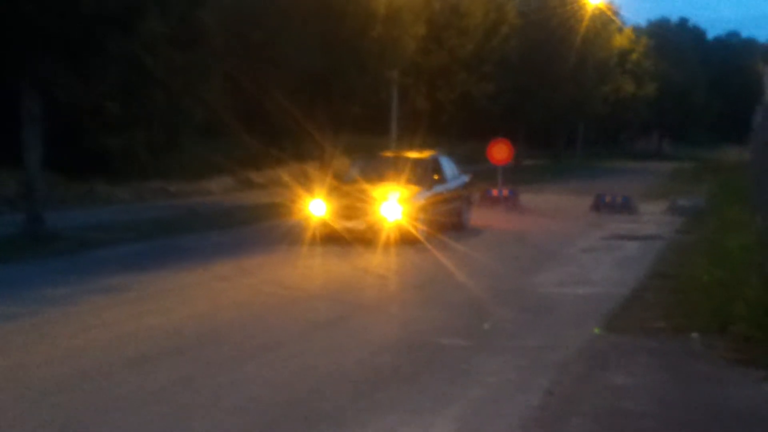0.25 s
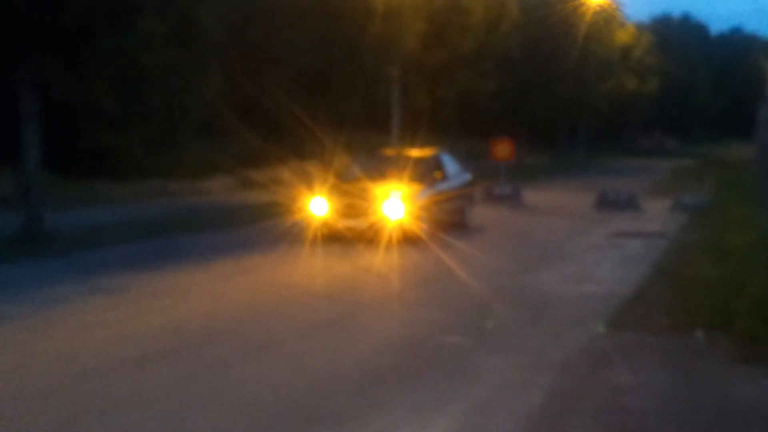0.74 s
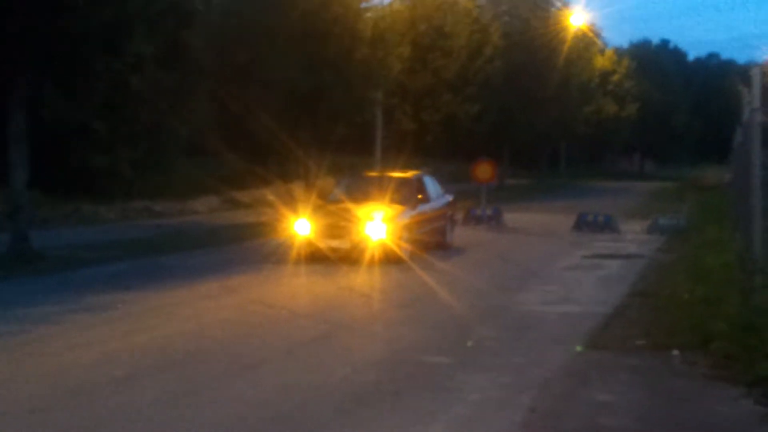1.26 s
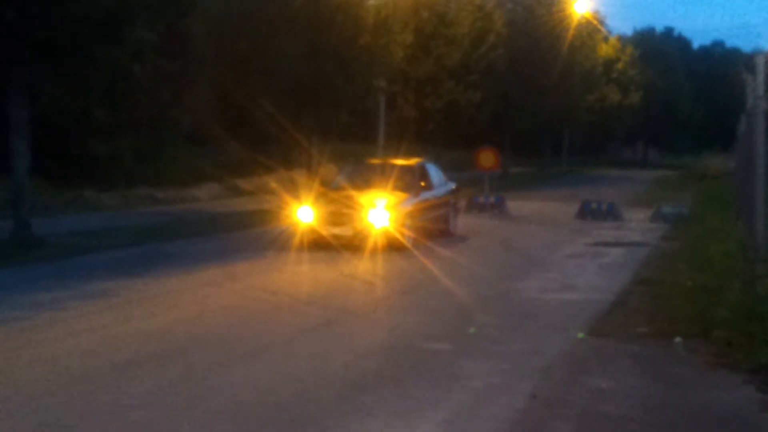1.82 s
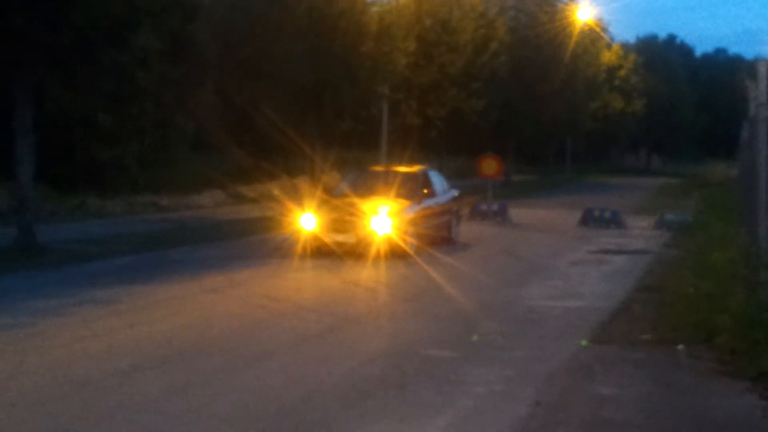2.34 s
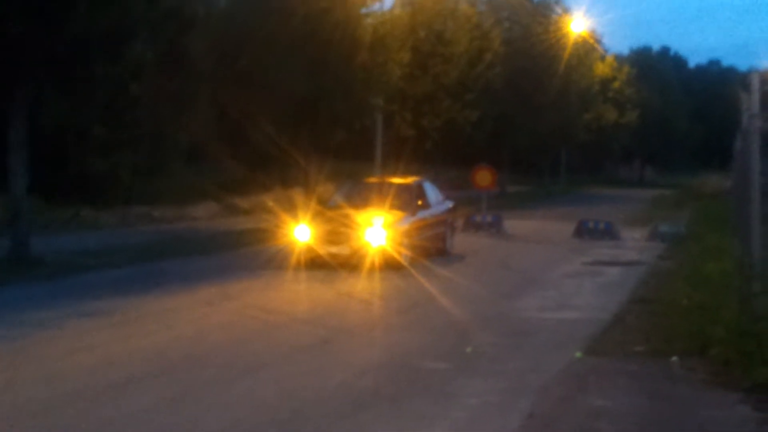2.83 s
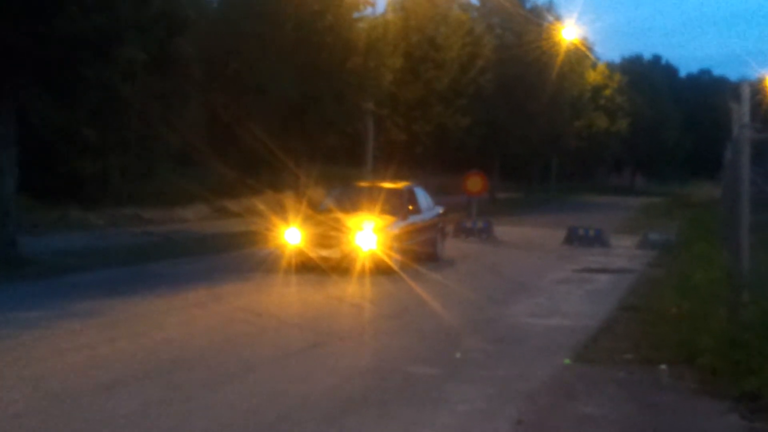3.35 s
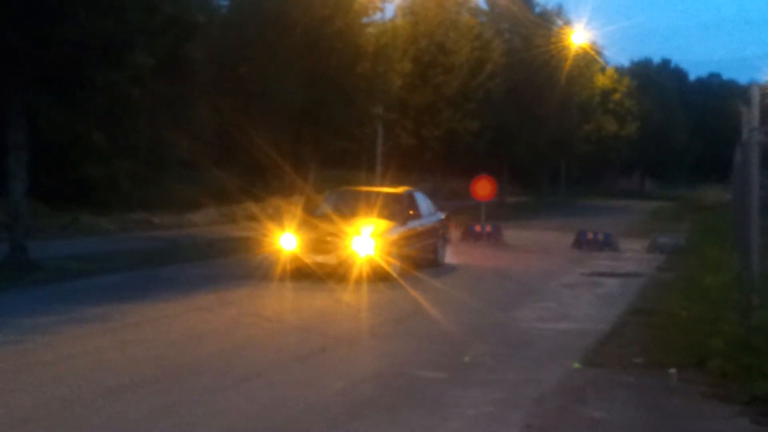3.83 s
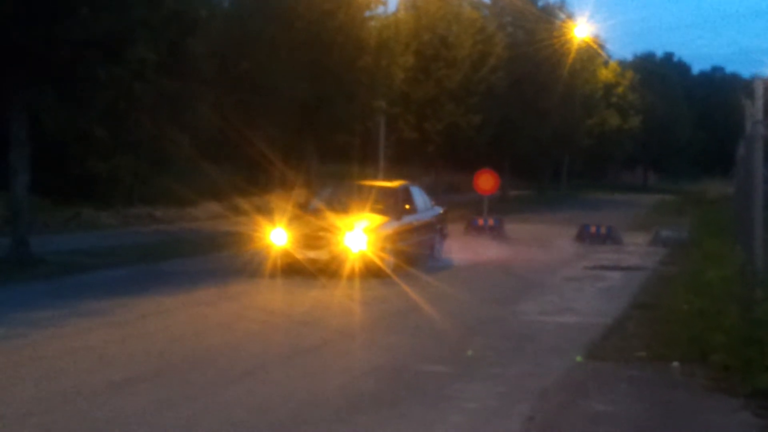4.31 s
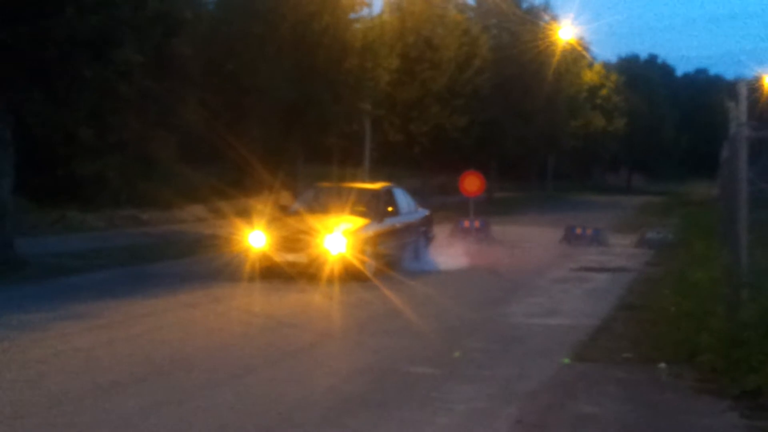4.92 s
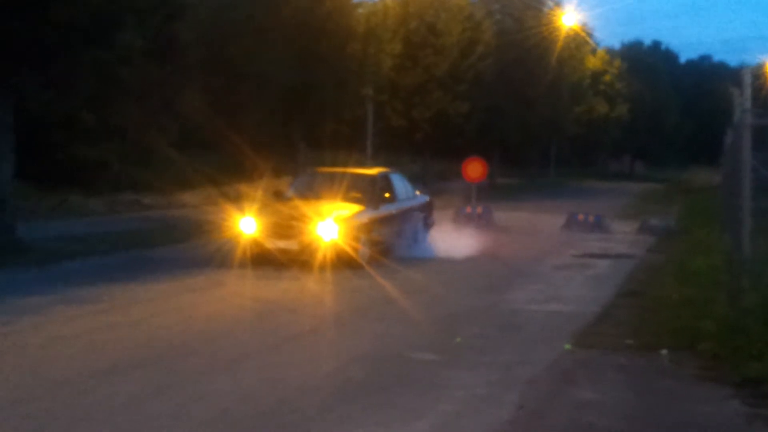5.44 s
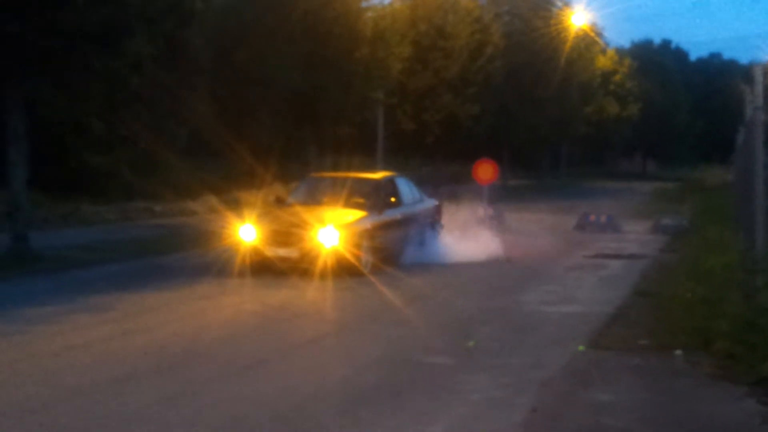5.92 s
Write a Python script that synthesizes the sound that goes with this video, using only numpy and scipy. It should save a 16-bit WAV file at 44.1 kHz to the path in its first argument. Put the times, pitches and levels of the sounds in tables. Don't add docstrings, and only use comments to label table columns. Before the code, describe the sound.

A six-cylinder turbo car idles fast and fairly quietly for nearly a second and a half, then blips upward in quick steps. Around three seconds the rear tyres spin, and rushing rubber roar, short squeals and gear whine join the barking exhaust. Revs surge and drop repeatedly with valve puffs and high turbo whistle. Handheld stereo microphone outdoors, several metres ahead, slight soft clipping, short echo from trees.

```python
import sys
import numpy as np
from scipy import signal
from scipy.fft import rfft, irfft, next_fast_len
from scipy.io import wavfile
from scipy.ndimage import uniform_filter1d, map_coordinates

SR = 44100
rng = np.random.default_rng(int(sys.argv[2]) if len(sys.argv) > 2 else 0)


def transcribe(u):
    v = np.clip(np.atleast_2d(u).T, -1, 1)
    q = np.round(v * 32767).astype(np.int16)
    wavfile.write(sys.argv[1], SR, q)


def convert_level_to_amplitude(level_db):
    exponent = np.asarray(level_db, float) / 20
    return 10 ** exponent


N = 272097
TIME = np.arange(N) / SR
EVEN = .065


def unit(x):
    return x / np.sqrt(np.mean(x ** 2) + 1e-20)


def steady(x):
    return x / np.sqrt(np.abs(uniform_filter1d(x ** 2, size=4000)) + 1e-12)


def along(points, hz):
    f, v = np.transpose(points)
    return np.interp(np.log(hz + 1), np.log(f + 1), v)


def curves(rows):
    s, *cols = np.transpose(rows)
    return [np.interp(TIME, s, c) for c in cols]


def wobble(rate):
    return map_coordinates(rng.standard_normal(int(N * rate / SR) + 4), [TIME * rate])


def bump(center_s, width_s):
    return np.exp(-((TIME - center_s) / width_s) ** 2)


def filtered(x, response):
    m = next_fast_len(N + SR // 2)
    return irfft(rfft(x, m) * response(np.fft.rfftfreq(m, 1 / SR)), m)[..., :N]


def causal(points):
    def response(hz):
        c = irfft(np.log(convert_level_to_amplitude(along(points, hz)) + 1e-6))
        c[1:len(c) // 2] *= 2
        c[len(c) // 2 + 1:] = 0
        return np.exp(rfft(c))
    return response


def above(hz, edge_hz):
    return 1 / (1 + (edge_hz / (hz + 1)) ** 8)


# (opens [s], shuts [s], half the firing rate as it takes hold [Hz],
# the same at the end [Hz], exhaust level [dB])
PRESSES = [(-.1, 1.275, 38.96, 39.82, -29), (1.447, 1.551, 37.1, 48.95, -16),
           (1.547, 1.62, 53.5, 58.5, -13), (1.622, 1.66, 63.12, 65.6, -17.5),
           (1.788, 1.857, 63.97, 65.1, -13.5), (1.937, 2.086, 66.4, 90.45, -12.5),
           (2.087, 2.211, 96.8, 113.2, -16), (2.265, 2.497, 108.1, 105.5, -17.5),
           (2.581, 2.724, 104.3, 127.3, -12.5), (2.72, 2.859, 134.3, 156, -14),
           (2.921, 3.02, 149.4, 142.2, -16), (3.113, 3.312, 144.6, 175.3, -13),
           (3.35, 3.435, 172, 168.5, -11.5), (3.477, 3.601, 111.1, 116, -17.5),
           (3.625, 3.724, 119.7, 125.7, -16.5), (3.741, 4.073, 127.1, 158.2, -17.5),
           (4.25, 4.528, 116.6, 147.2, -16), (4.655, 4.728, 110.5, 108.2, -15.5),
           (4.731, 5.0, 112.9, 156.8, -16), (4.997, 5.125, 159.4, 163.9, -18),
           (5.355, 5.639, 106.7, 138.2, -15.5), (5.64, 5.76, 138.2, 138.8, -18.5),
           (5.77, 6.046, 138.6, 157.6, -16.5)]


def driver():
    takes_hold_s, flywheel_s, last_hz = .03, .03, 134.6
    open_s, shut_s = .008, .03
    clutch_in_s = 3.48
    ms, t = 1000, np.arange(0, N / SR, .001)
    opens, shuts, start_hz, end_hz, db = np.transpose(PRESSES)
    knot_s = np.append(np.ravel([opens + takes_hold_s, shuts], "F"), N / SR)
    knot_hz = np.append(np.ravel([start_hz, end_hz], "F"), last_hz)
    half_hz = uniform_filter1d(np.interp(t, knot_s, knot_hz), size=int(flywheel_s * ms))
    octaves = np.log2(half_hz / 100)
    rising = np.gradient(np.log(half_hz)) * ms

    opening = (t - opens[:, None]) / open_s + 1
    shutting = (shuts[:, None] - t) / shut_s + 1
    held = np.clip(np.minimum(opening, shutting), 0, 1)
    throttle = np.minimum(held.sum(0), 1)
    coast_db = np.minimum(-26 + 5.5 * octaves, -19)
    pressed_db = (db @ held) / (held.sum(0) + 1e-9)
    thump_db = throttle * pressed_db + (1 - throttle) * coast_db

    loaded = t > clutch_in_s
    idling = t < opens[1] - open_s
    free = ~idling * (t < clutch_in_s) * np.clip(1 - 2 * rising, 0, 1)
    lug_db = 7 * throttle * loaded * np.clip((115.2 - half_hz) / 12, 0, 1)
    pull_db = 1.5 * loaded - 8.5 * free + 1.5 * np.clip(rising, 0, 1.2)
    bark_db = throttle * (-2 + pull_db) + (1 - throttle) * -2.5 + 7.5 * np.minimum(octaves, 0)
    bark_db = np.where(idling, -19.5, bark_db + lug_db)

    hunting = .1 * free * (half_hz < 160) + .04 * ~idling * np.clip(-octaves, 0, 1)
    uneven = .09 + .16 * np.maximum(-rising, 0) + .35 * idling
    rough = np.minimum(EVEN + hunting + (1 - throttle) ** 2 * uneven, .47)
    return [np.interp(TIME, t, c) for c in (half_hz, thump_db - lug_db, bark_db, rough)]


# (pulse strength [dB], lateness [share of a firing gap], extra at idle [dB])
CYLINDERS = [(.6, 0, 0), (-4.4, .13, 1.5), (-.6, .01, 3.5), (-4, .12, 0), (0, -.01, -3.5), (-5, .11, -1.5)]


def firings(turns, load, rough):
    k = np.arange(int(turns[-1]) - 1)
    db, late, idle_db = np.array(CYLINDERS)[k % 6].T
    chance = np.clip(rng.standard_normal((len(k), 2)), -1.3, 1.3)
    when = np.interp(k, turns, TIME)
    rough = np.interp(when, TIME, rough)
    db = db * (1 + 5 * (rough - EVEN)) + idle_db * (1 - np.interp(when, TIME, load))
    late = late * (1 + .28 * (when > 1.45) * wobble(9)[(when * SR).astype(int)])
    jitter = np.clip(.45 * rough * chance[:, 0], -.4, .4)
    at = np.interp(k + .5 + late + jitter, turns, np.arange(N))
    size = convert_level_to_amplitude(db + 18 * np.minimum(rough, .35) * chance[:, 1])
    taps = np.floor(at)[:, None] + np.arange(-7, 9)
    offset = taps - at[:, None]
    kernel = np.sinc(offset) * np.cos(np.pi * offset / 16) ** 2
    return np.bincount(taps.astype(int).ravel(), (size[:, None] * kernel).ravel(), N + 16)[:N]


# (frequency [Hz], level [dB])
IDLE_PIPE = [(60, -45), (85, -24), (118, -8), (140, -15.5), (160, -8.5), (196, 1), (240, -8), (275, -17),
             (312, 5.5), (350, -23), (430, -13), (500, -24.5), (620, -14), (800, -69), (4000, -115)]
# (frequency [Hz], level [dB])
LOAD_PIPE = [(60, -64), (100, -13.5), (150, -7), (220, 2), (300, 1.5), (385, -5.5), (450, 2), (510, -3.5),
             (600, 0.5), (730, -3), (850, -15.5), (1000, -6.5), (1400, -38), (6000, -110)]


def exhaust(load, half_hz, thump_db, bark_db, rough):
    pulses = firings(np.cumsum(2 * half_hz) / SR, load, rough)
    gas = steady(pulses) + .17 * rng.standard_normal(N)
    idle = unit(filtered(gas, causal(IDLE_PIPE)))
    loaded = unit(filtered(gas, causal(LOAD_PIPE)))
    pipe = (1 - load) * idle + load * loaded
    bark = filtered(pipe, lambda hz: above(hz, 425))
    return convert_level_to_amplitude(thump_db) * (steady(pipe - bark) + convert_level_to_amplitude(bark_db - 1.5) * steady(bark))


# (time [s], roar level [dB], turbo boost [0-1])
SPIN = [(0, -41, 0.36), (1.41, -40, 0.26), (1.58, -32.5, 0.03), (1.9, -32.5, 0), (2.18, -24.5, 0),
        (2.42, -24.5, 0), (2.57, -26.5, 0.05), (2.8, -21, .1), (3.4, -17, .35), (3.6, -15, .6),
        (3.85, -14.5, 0.68), (4.3, -15.5, 0.93), (5.0, -16.5, 0.94), (5.3, -15, .7), (5.55, -16.5, 1.05),
        (6.17, -17.5, 0.9)]
# (time [s], level over the roar [dB], width [s])
PUFFS = [(2.46, 2.5, 0.034), (2.86, 3.5, 0.11), (3.28, 0.5, 0.02), (3.485, 8, 0.029), (3.608, 5.5, 0.0078),
         (3.78, 2, 0.015), (4.098, 5, 0.035), (4.54, 5.5, 0.026), (4.608, 1, 0.011), (5.08, 2.5, 0.036),
         (5.129, 4.5, 0.016), (5.19, 3, 0.05), (5.275, 2.5, 0.016), (5.76, 2.5, 0.075), (5.96, 2, 0.029),
         (6.068, 6, 0.026), (6.142, 3.5, 0.033)]


def rush_levels(half_hz):
    spin_db, boost = curves(SPIN)
    puff_db = sum(db * bump(s, width) for s, db, width in PUFFS)
    hiss_db = -20.5 + 11 * boost + 0.92 * wobble(22)
    air = convert_level_to_amplitude(-43.5 + 25 * boost + 4 * np.log2(half_hz / 130) + 2.5 * wobble(16))
    idle_air = convert_level_to_amplitude(-58 - spin_db) * np.clip((2.1 - TIME) / .3, 0, 1)
    return spin_db + puff_db, hiss_db, 20 * np.log10(air + idle_air) - 0.45 * puff_db


# (frequency [Hz], likeness [-1 to 1])
ALIKE = [(60, .99), (600, .99), (1200, .88), (2000, .85), (3000, .88), (5000, .7), (8000, -.2),
         (13000, -.3)]


def pair(spectrum, patchy_db):
    z = signal.stft(rng.standard_normal((2, N + 512)), nperseg=512)[2]
    field = uniform_filter1d(rng.standard_normal(z.shape[1:]), size=4, axis=0)
    field = uniform_filter1d(field, size=5, axis=1)
    two = signal.istft(z * convert_level_to_amplitude(patchy_db * unit(field)), nperseg=512)[1][:, :N]

    def spread(hz):
        turn = np.arccos(np.clip(along(ALIKE, hz), -1, 1)) / 2
        return convert_level_to_amplitude(along(spectrum, hz)) * [np.cos(turn), np.sin(turn)]
    mid, side = filtered(two, spread)
    return np.array([mid + side, mid - side])


def chirps(count, pitch_hz=2100, spread=.27, life=0.022):
    u, g = rng.random((count, 2)), rng.standard_normal((count, 2))
    t = np.arange(3000) / SR
    g = np.clip(g, -2, 2)
    hz = pitch_hz * np.exp(spread * g[:, :1])
    span = life * (.5 + 1.2 * u[:, 1:])
    swell = np.sin(np.pi * np.clip(t / (2 * span), 0, 1)) ** 2
    tone = convert_level_to_amplitude(3 * g[:, 1:]) * np.sin(2 * np.pi * hz * t) * swell
    at = (u[:, :1] * N).astype(int) + np.arange(len(t))
    return unit(np.bincount(at.ravel(), tone.ravel())[:N])


def bounced(x, bounce):
    first, gap, db = np.transpose(bounce)[:, :, None]

    def mirror(hz):
        strength = convert_level_to_amplitude(db) * above(hz, 550) * (1 - above(hz, 6500))
        return strength * np.exp(-2j * np.pi * (hz - first) / gap)
    return filtered(x, lambda hz: 1 - mirror(hz))


# (frequency [Hz], level [dB per Hz])
BAY = [(350, -26), (600, -10), (800, -9), (1130, -15), (1340, -17), (1580, -16.5), (2720, -18),
       (6750, -37.5), (14300, -35.5)]
# (frequency [Hz], level [dB per Hz])
RUBBER = [(250, -24.5), (500, -3.5), (900, -4), (1420, -5), (2400, -7.5), (3400, -4), (4500, -18),
          (6080, -32), (10000, -29.5), (14300, -32.5)]
# (time [s], level [dB], width [s])
PEDAL = (1.225, -43, .022)
# (first notch [Hz], notch spacing [Hz], strength [dB])
BOUNCE_IDLE = [(860, 503, -4), (820, 520, -5)]
# (first notch [Hz], notch spacing [Hz], strength [dB])
BOUNCE_SPIN = [(934, 531, -0.5), (811, 584, -13)]


def roar(spin, half_hz):
    roar_db, hiss_db, air_db = rush_levels(half_hz)
    bay = bounced(pair(BAY, patchy_db=-2.56), BOUNCE_IDLE)
    rubber = unit(pair(RUBBER, patchy_db=1.0))
    rubber = rubber + 0.4 * np.clip((TIME - 3) * 2, 0, 1) * chirps(count=900)
    rubber = bounced(rubber, BOUNCE_SPIN)
    bands = [(0, lambda hz: 1 - above(hz, 4800)),
             (hiss_db, lambda hz: above(hz, 4800) - above(hz, 10200)),
             (air_db + 2, lambda hz: above(hz, 10200))]
    total = 0
    for db, band in bands:
        mix = np.sqrt(1 - spin) * unit(filtered(bay, band))
        mix = mix + np.sqrt(spin) * unit(filtered(rubber, band))
        total = total + convert_level_to_amplitude(db + 0.82 * wobble(14)) * mix
    pedal_s, pedal_db, width_s = PEDAL
    rasp = unit(filtered(bay, lambda hz: above(hz, 1500) * hz))
    return convert_level_to_amplitude(roar_db) * total + convert_level_to_amplitude(pedal_db) * bump(pedal_s, width_s) * rasp


# (time [s], length [s], start
# pitch [Hz], end pitch [Hz], level [dB])
SQUEALS = [(3.264, 0.036, 2860, 2750, -23), (3.47, 0.046, 1765, 1826, -22), (4.345, 0.037, 1750, 1960, -17),
           (4.836, 0.087, 1610, 1620, -22), (4.857, 0.047, 2800, 2860, -21.5),
           (5.147, 0.018, 1840, 1734, -22), (5.234, .065, 2130, 2205, -18), (5.239, 0.058, 1444, 1564, -17),
           (5.637, 0.066, 1776, 1721, -19.5), (5.702, 0.115, 1640, 1700, -17),
           (5.798, 0.15, 1710, 1777, -19), (5.94, 0.089, 2730, 2580, -15.5)]


def squeals():
    out = np.zeros(N)
    for s, length, start_hz, end_hz, db in SQUEALS:
        u = np.linspace(0, 1, int(length * SR))
        hz = start_hz + (end_hz - start_hz) * u
        tone = np.sin(2 * np.pi * np.cumsum(hz) / SR)
        out[int(s * SR):][:len(u)] += convert_level_to_amplitude(db) * np.sin(np.pi * u) * tone
    return out * convert_level_to_amplitude(2.5 * wobble(70) - 1.5)


# (time [s], pitch [Hz], level [dB])
TURBO = [
    [(3.72, 7900, -46), (3.86, 8980, -39), (4.01, 9980, -37), (4.07, 10150, -41)],
    [(4.2, 8400, -47), (4.38, 9400, -39), (4.54, 10050, -42)],
    [(4.78, 8750, -45), (4.94, 9820, -39), (5.04, 10200, -37), (5.12, 10380, -42)],
    [(5.5, 8650, -42), (5.62, 9350, -40), (5.7, 9750, -45)],
    [(5.84, 9650, -43), (5.93, 9950, -40), (6.04, 10300, -43)],
]


def turbo():
    out = np.zeros(N)
    for rows in TURBO:
        hz, db = curves(rows)
        fade = np.clip(np.minimum(TIME - rows[0][0], rows[-1][0] - TIME) / 0.042, 0, 1)
        whistle = np.sin(2 * np.pi * np.cumsum(hz + 45 * wobble(150)) / SR)
        out += fade * convert_level_to_amplitude(db + 2.5 + 2.5 * wobble(50)) * whistle
    return out * [[1.2], [.8]]


# (multiple of half the firing rate, level under full spin [dB])
GEARS = [(7, -24), (12, -31)]


def gears(spin, half_hz, rough):
    phase = 2 * np.pi * np.cumsum(half_hz) / SR
    whine = 0
    for k, db in GEARS:
        level = convert_level_to_amplitude(db + 4 * np.clip(wobble(14), -3, 1))
        whine = whine + level * np.sin(k * phase + 1.4 * wobble(40))
    return spin * (1 - rough) ** 6 * whine


# (frequency [Hz], time to fall 60 dB [s])
TREES = [(100, 0.5), (1000, 0.097), (8000, 0.083)]


def trees(x):
    hz, t, z = signal.stft(rng.standard_normal((2, SR // 2)), SR, nperseg=256)
    tail = signal.istft(z * convert_level_to_amplitude(-60 * t / along(TREES, hz)[:, None]), SR, nperseg=256)[1]
    tail = tail.mean(0) + .5 * (tail - tail.mean(0))
    late = np.pad(x, (700, 0))[None]
    return signal.fftconvolve(late, tail / np.linalg.norm(tail[0]), axes=1)[:, :N]


def scene():
    half_hz, thump_db, bark_db, rough = driver()
    load = np.interp(TIME, [1.44, 1.452], [0, 1])
    spin = np.interp(TIME, [1.9, 3.3], [0, 1])
    thump_db = thump_db + .8 * load * wobble(30)
    pipe = -exhaust(load, half_hz, thump_db, bark_db + 1.2 * wobble(30), rough)
    tones = bounced(gears(spin ** 2, half_hz, rough) + squeals(), BOUNCE_SPIN)
    return pipe + convert_level_to_amplitude(-8.0) * trees(pipe) + tones + roar(spin, half_hz) + turbo()


def masked(x):
    hz, _, z = signal.stft(x, SR, nperseg=2048)
    power = np.abs(z[:, :1024]) ** 2
    band = power.reshape(2, 128, 8, -1).sum(2).mean(0)
    below_db = 10 * np.log10(band / power.sum(1).mean(0) + 1e-12)
    khz = hz[4:1024:8, None] / 1000
    luck = unit(uniform_filter1d(rng.standard_normal(band.shape), size=2, axis=1))
    keep = (below_db + 11 * luck > 1.5 * khz - 77) | (khz < 5.6)
    keep = np.pad(keep.repeat(8, 0), ((0, 1), (0, 0)))
    return signal.istft(z * keep, SR, nperseg=2048)[1][:, :N]


def top_cut(x):
    return signal.sosfilt(signal.butter(12, 14480, fs=SR, output="sos"), x)


# (frequency [Hz], left over right [dB])
TILT = [(60, 9), (110, 4), (200, 4), (370, 1.5), (670, 0), (1230, -8), (2260, -6.5), (4140, -2.5),
        (7580, 4), (13900, 7.5)]


def record(dry):
    x = filtered(dry, lambda hz: convert_level_to_amplitude(along(TILT, hz) * np.array([[.5], [-.5]])))
    x = x / (1 + np.abs(x / 1.15) ** 6) ** (1 / 6)
    x = filtered(x, lambda hz: np.maximum(above(hz, 75), .3) * (hz < 14480))
    rumble = filtered(rng.standard_normal((2, N)), lambda hz: (hz > 15) * (1 - above(hz, 60)) * 20)
    return top_cut(masked(x + convert_level_to_amplitude(-77) * rumble))


dry = scene()
out = record(dry)
transcribe(out)
```